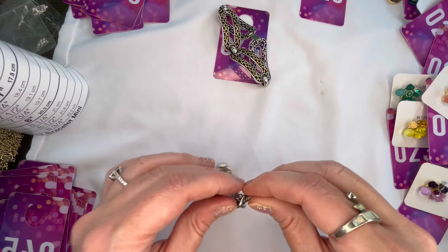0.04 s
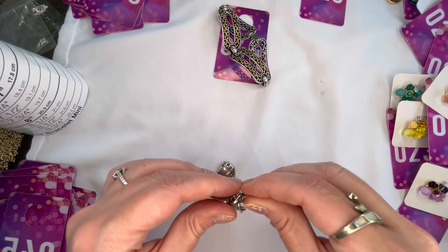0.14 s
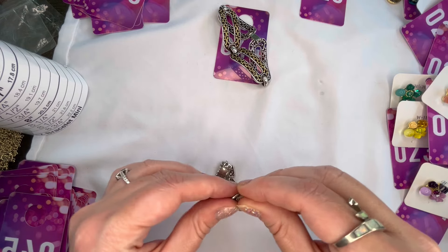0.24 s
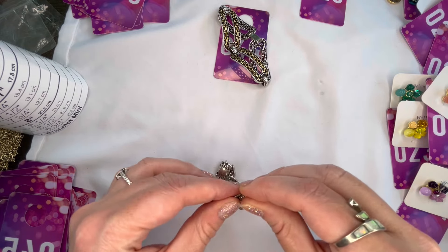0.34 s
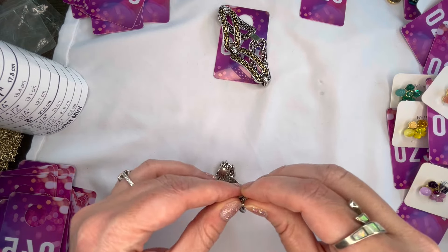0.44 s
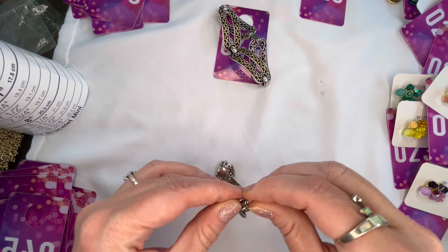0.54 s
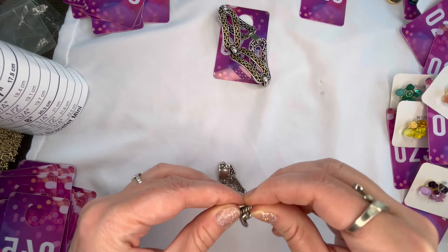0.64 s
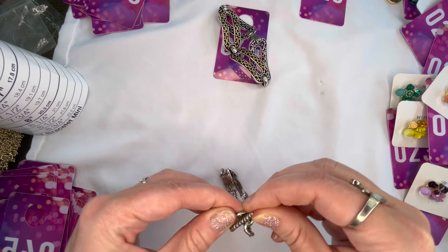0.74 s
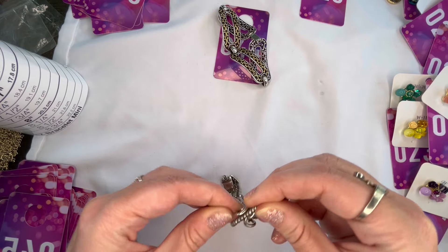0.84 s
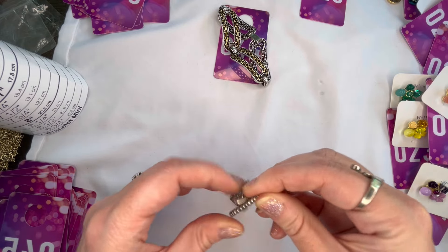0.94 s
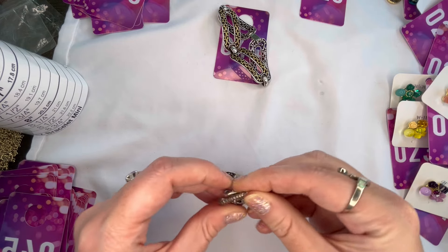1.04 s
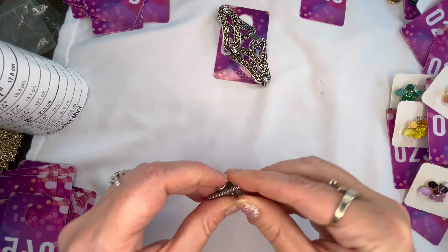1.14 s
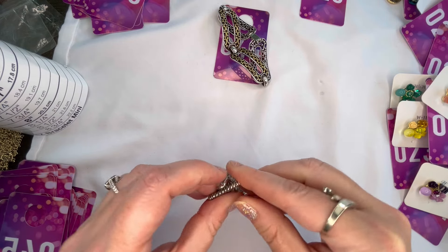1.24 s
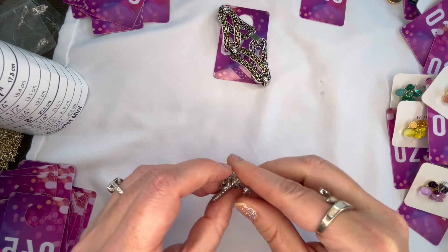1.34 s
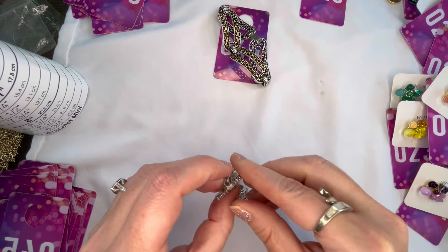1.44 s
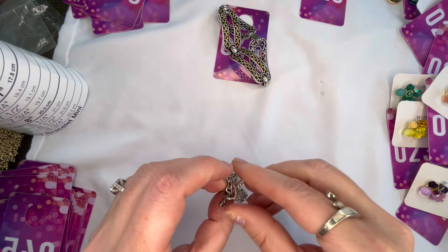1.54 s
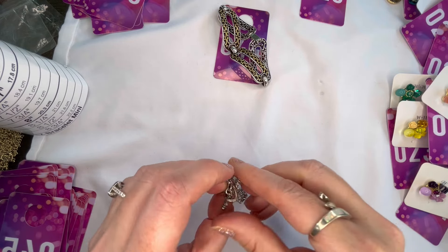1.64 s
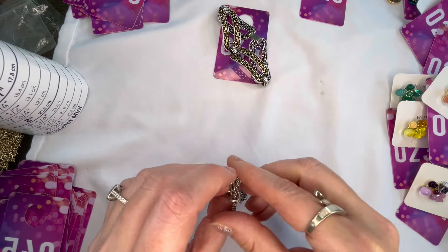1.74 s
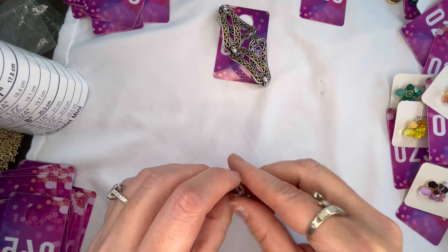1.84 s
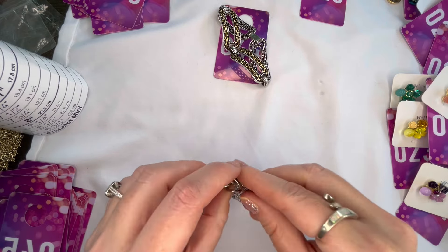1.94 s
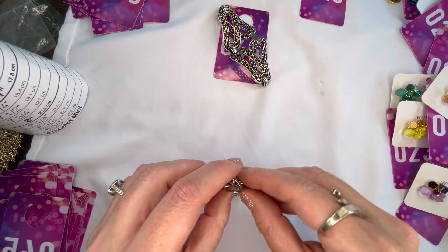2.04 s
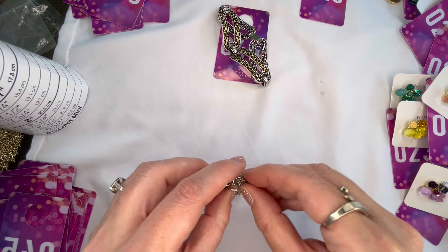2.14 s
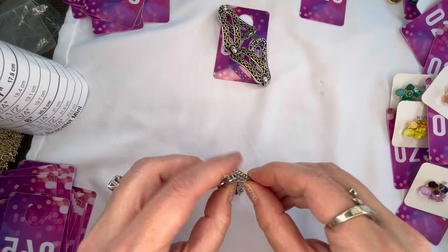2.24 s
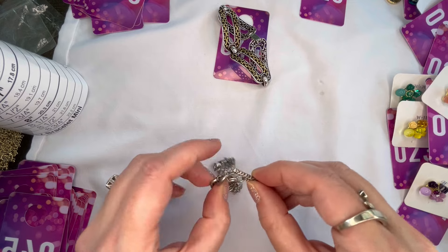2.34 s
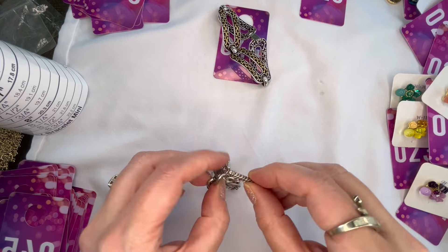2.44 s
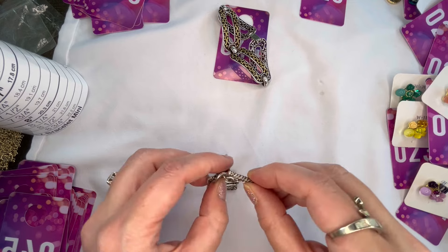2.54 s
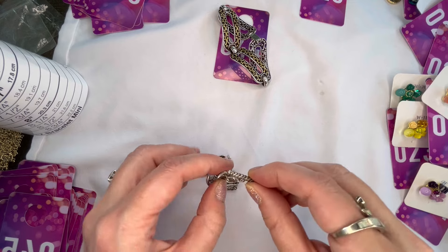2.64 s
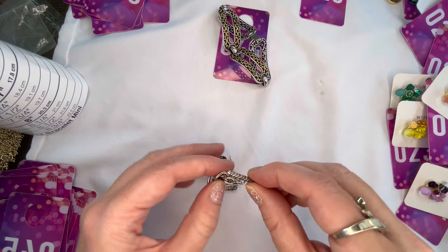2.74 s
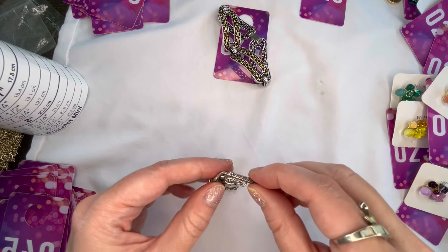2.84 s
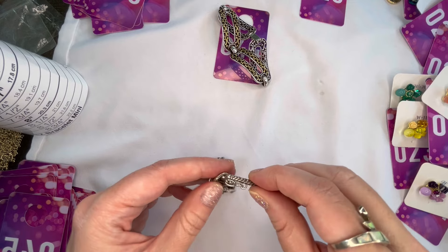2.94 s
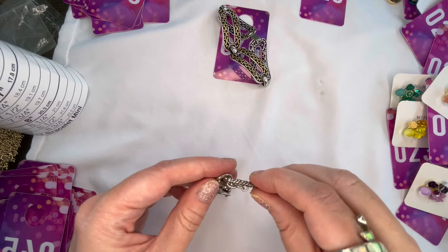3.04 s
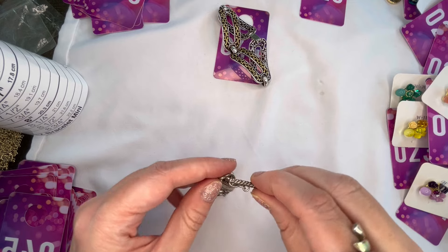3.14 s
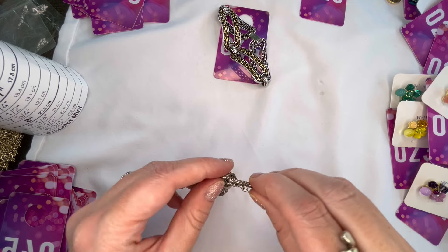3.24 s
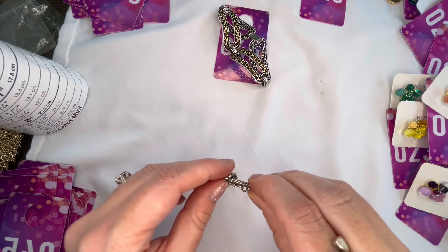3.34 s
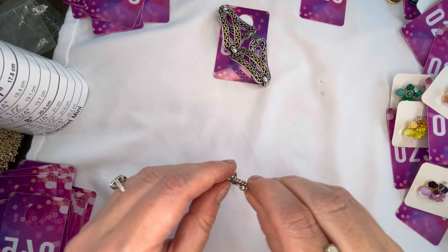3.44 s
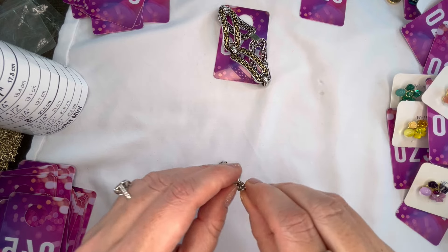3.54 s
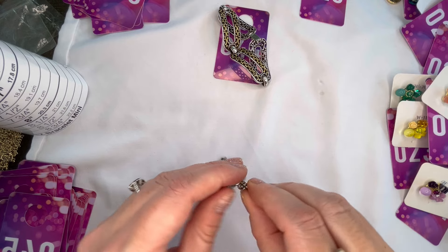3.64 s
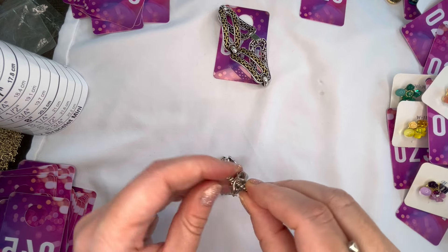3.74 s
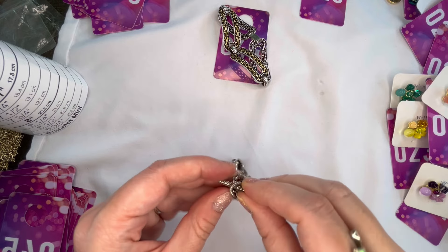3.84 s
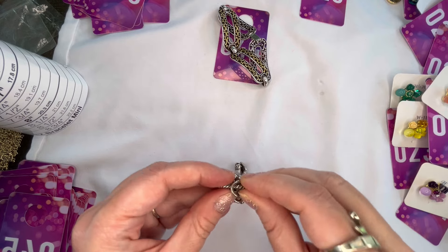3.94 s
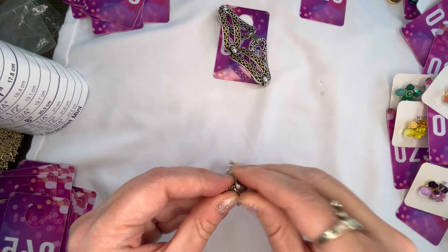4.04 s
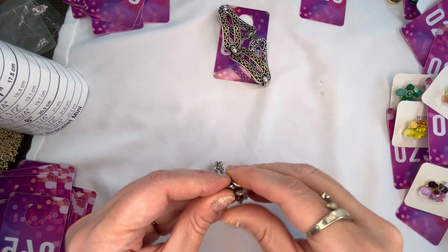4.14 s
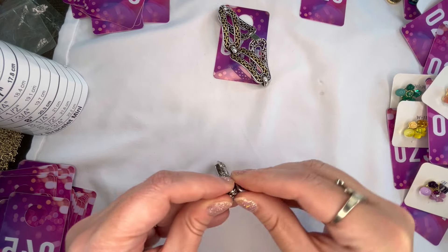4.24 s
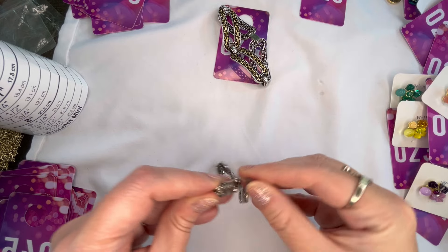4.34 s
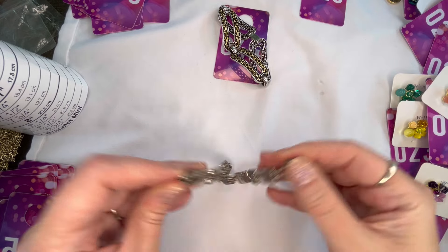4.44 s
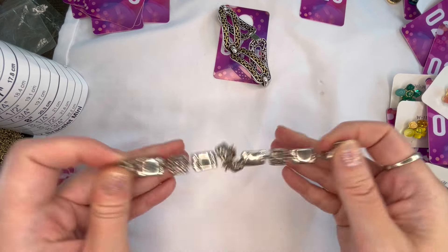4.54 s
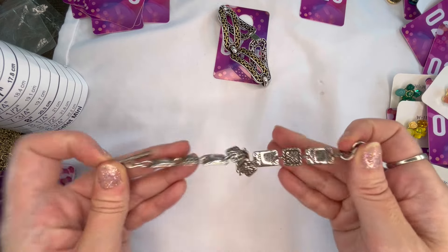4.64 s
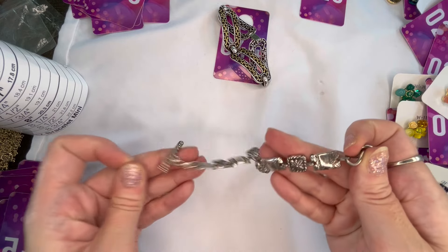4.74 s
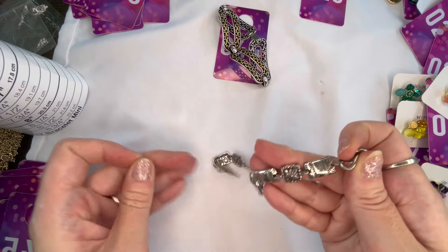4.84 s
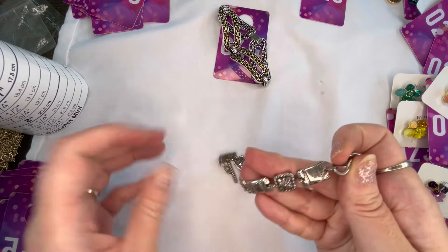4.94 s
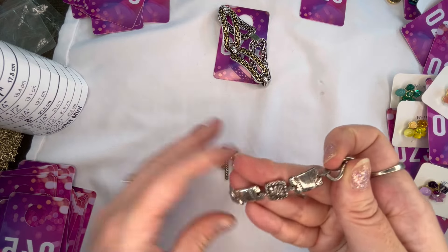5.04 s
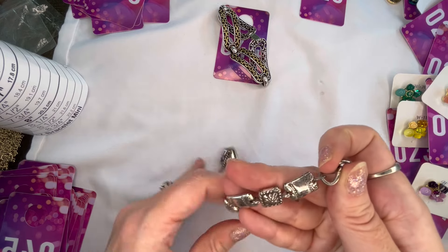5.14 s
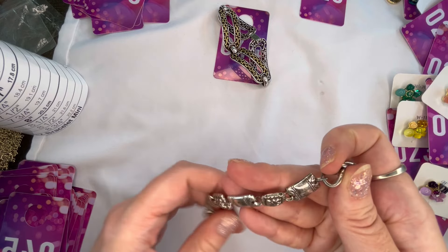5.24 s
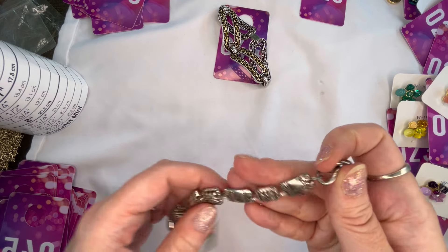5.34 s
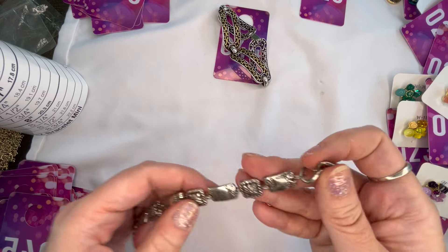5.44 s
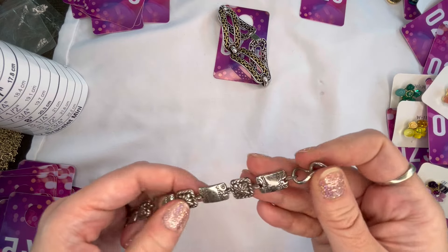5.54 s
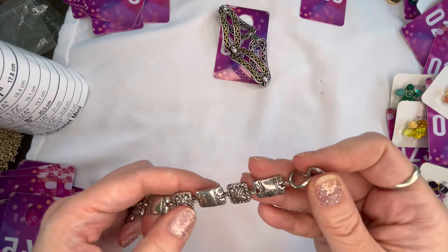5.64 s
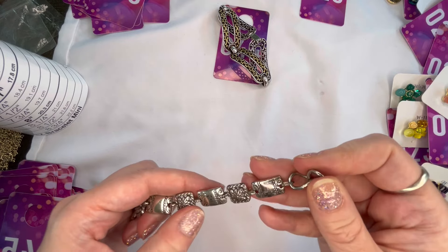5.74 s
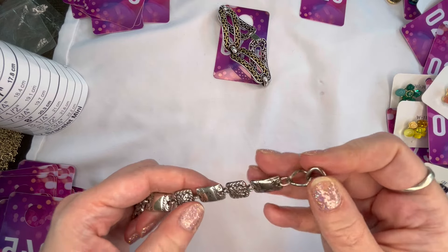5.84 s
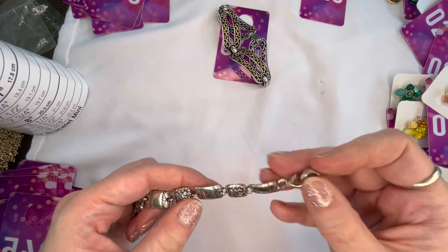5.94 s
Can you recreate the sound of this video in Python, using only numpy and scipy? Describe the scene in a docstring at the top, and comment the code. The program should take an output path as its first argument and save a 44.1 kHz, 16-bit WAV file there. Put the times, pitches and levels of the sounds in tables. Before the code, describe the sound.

Delicate high metal ticks and dry link rubbing from hands close to the microphone, over soft room rumble and mains hum. They start in a little flurry, thin out, then thicken past the middle. Near the end comes by far the loudest event, a hard crack on a cloth-covered table with a piercing short ring, followed by a thin hissing drag, a smaller knock and a hollow clack.

```python
"""A small quiet room, a two-port camera microphone close to hands that work a steel bracelet's clasp over a table.
First a cluster of ticks and soft knocks, a fingertip brushing metal, then sparser ticks and grinding of the links.
From about 3.4 s the links get busier; near 4.83 s the freed end drops on the clothed table and rings very high.
It is dragged hissing over the weave, knocks again near 5.54 s, and the gathered links clink and clack at 5.93 s.
Throughout: filtered-noise rumble and hiss, sine mains hum. Metal is noise bursts and decaying sines."""
import sys
import numpy as np
from scipy import signal
from scipy.fft import rfft, irfft, next_fast_len
from scipy.io import wavfile
from scipy.ndimage import uniform_filter1d, map_coordinates

SR = 44100
rng = np.random.default_rng(int(sys.argv[2]) if len(sys.argv) > 2 else 0)


def generate_wav(signal):
    """Clip the signal to [-1, 1] and save it as 16-bit WAV at the path in sys.argv[1]."""
    frames = np.transpose(np.atleast_2d(signal))
    scaled = np.clip(frames, -1, 1) * 32767
    pcm = np.round(scaled).astype(np.int16)
    wavfile.write(sys.argv[1], SR, pcm)


N = 263530  # samples


def amp(db):
    """Decibels to gain."""
    return 10 ** (np.asarray(db) / 20)


def unit(x):
    """Scaled to rms 1."""
    return x / np.sqrt(np.mean(x ** 2) + 1e-20)


def attack_unit(x):
    """Scaled to rms 1 over the first 3 ms."""
    return x / np.sqrt(np.mean(x[..., :3 * SR // 1000] ** 2))


def along(points, hz):
    """(f/Hz, value) points joined on a log frequency axis."""
    f, v = np.transpose(points)
    return np.interp(np.log(hz + 1), np.log(f + 1), v)


def curves(rows):
    """One value per sample for each column after the time."""
    s, *columns = np.transpose(rows)
    return [np.interp(np.arange(N) / SR, s, column) for column in columns]


def wobble(rate):
    """A smooth random curve, rate knots a second."""
    knots = rng.standard_normal(int(N * rate / SR) + 4)
    return map_coordinates(knots, [np.arange(N) * rate / SR])


def coloured(x, db_of):
    """Causal minimum-phase filter with a gain in dB at each frequency."""
    n = x.shape[-1]
    m = 2 * next_fast_len(n + 2048)
    gain = amp(db_of(np.fft.rfftfreq(m, 1 / SR)))
    cepstrum = irfft(np.log(gain + 1e-6))
    # fold the cepstrum onto positive time
    cepstrum[1:m // 2] *= 2
    cepstrum[m // 2 + 1:] = 0
    return irfft(rfft(x, m) * np.exp(rfft(cepstrum)), m)[..., :n]


def noise(spectrum):
    """Noise of rms 1 with the given spectrum."""
    return unit(coloured(rng.standard_normal(N), lambda hz: along(spectrum, hz)))


def evened(burst, size=9):
    """A noise burst with its chance spectral peaks and dips flattened, as even as an impulse."""
    power = np.abs(uniform_filter1d(np.abs(rfft(burst)) ** 2, size))
    burst_hz = np.fft.rfftfreq(len(burst), 1 / SR)
    return coloured(burst, lambda hz: -10 * np.log10(np.interp(hz, burst_hz, power) + 1e-12))


def fade(t, t60):
    """Exponential decay by 60 dB in t60 seconds."""
    return np.exp(-np.log(1000) * t / t60)


def ringing(modes, t):
    """A sum of decaying modes (f/Hz, level/dB, t60/s) with new phases."""
    return sum(amp(db) * fade(t, t60) * np.sin(2 * np.pi * (hz * t + rng.random()))
               for hz, db, t60 in modes)


def add(track, s, sound):
    """Mix a sound into a track at s seconds."""
    start = max(round(s * SR), 0)
    part = sound[..., :max(N - start, 0)]
    track[..., start:start + part.shape[-1]] += part


# background colour at each microphone port: (f/Hz, relative level/dB)
LEFT_FLOOR = [(20, -22.5), (45, -1), (100, -6), (160, -15.5), (300, -23.5), (700, -30.5), (950, -25.5),
              (1200, -17), (1600, -19.5), (1950, -35), (2900, -42), (7000, -45.5), (11000, -55),
              (14000, -63)]
RIGHT_FLOOR = [(20, -3.5), (45, -0.5), (100, -2.5), (160, -14.5), (300, -20.5), (700, -32), (1200, -28.5),
               (1600, -35), (2300, -42), (5500, -51), (9500, -42), (11500, -56.5), (14000, -68)]
# slow drift of the room rumble about its mean: (t/s, level/dB)
RUMBLE_DRIFT = [(0.0, -59.5), (0.7, -62), (1.15, -62.5), (1.56, -62), (3.06, -61), (3.2, -59), (5.38, -60),
                (5.98, -61)]
RUMBLE_SWING_DB, RUMBLE_SWINGS_PER_S = 0.82, 4.88  # the rumble wanders at random
MAINS_HZ, WHINE_HZ = 60, 7850


def background(left_db=-58, right_db=-58, hum_db=-63, whine_db=-90):
    """Rumble common to both ports, each port's own hiss, mains hum and a faint narrow whine."""
    # the ports share the lows, up to some 450 Hz
    shared_db = lambda hz: -10 * np.log10(1 + (hz / 450) ** 4)
    own_db = lambda hz: 10 * np.log10(1.05 - amp(shared_db(hz)) ** 2)
    drift_db, = curves(RUMBLE_DRIFT)
    level_db = drift_db - drift_db.mean() + RUMBLE_SWING_DB * wobble(RUMBLE_SWINGS_PER_S)
    shared = coloured(rng.standard_normal(N), shared_db) * amp(level_db)
    white = shared + coloured(rng.standard_normal((2, N)), own_db)
    left = amp(left_db) * unit(coloured(white[0], lambda hz: along(LEFT_FLOOR, hz)))
    right = amp(right_db) * unit(coloured(white[1], lambda hz: along(RIGHT_FLOOR, hz)))
    t = np.arange(N) / SR
    hum = amp(hum_db) * unit(amp(3.5 * wobble(2.6)) * np.sin(2 * np.pi * MAINS_HZ * t))
    whine = amp(whine_db) * unit(wobble(560) * np.sin(2 * np.pi * WHINE_HZ * t))
    return np.array([left, right]) + hum + whine


# decay of the small room: (f/Hz, t60/s)
ROOM_DECAY = [(150, 0.25), (1000, 0.2), (3500, 0.26), (10000, 0.21), (15000, 0.054)]


def room(x):
    """A diffuse noise tail for each port, 3.3 ms late; the highest treble dies first."""
    hz, t, z = signal.stft(rng.standard_normal((2, SR // 2)), SR, nperseg=256)
    decaying = z * fade(t, along(ROOM_DECAY, hz)[:, None])
    tail = signal.istft(decaying, SR, nperseg=256)[1]
    tail = np.pad(tail / np.linalg.norm(tail[0]), ((0, 0), (SR // 300, 0)))
    return signal.fftconvolve(x[None], tail, axes=1)[:, :N]


# how far the left port leads the right for sound from between the hands: (f/Hz, phase/rad)
LEFT_LEAD = [(20, -0.5), (700, 1.4), (1500, 0.75), (3200, 3), (6300, 5.5), (9200, 6), (10200, 1.65),
             (11200, -0.4), (13400, -3), (15500, -6.5)]


def staggered(x):
    """The direct sound reaches the two ports out of step."""
    m = next_fast_len(N + SR // 2)
    turn = np.exp(.5j * along(LEFT_LEAD, np.fft.rfftfreq(m, 1 / SR)))
    return irfft(rfft(x, m) * np.array([turn, turn.conj()]), m)[:, :N]


def ports(x, scatter_db=-4, scatter_t60=0.0046, count=24):
    """Sound from between the hands: direct, plus what the moving fingers scatter differently to each port."""
    pair, t = staggered(x), np.arange(SR // 100) / SR
    # new scattering paths for each of count stretches of time
    for where in np.array_split(np.arange(N), count):
        paths = rng.standard_normal((2, len(t))) * fade(t, scatter_t60)
        paths *= amp(scatter_db) / np.linalg.norm(paths, axis=1, keepdims=True)
        add(pair, where[0] / SR, signal.fftconvolve(x[where][None], paths, axes=1))
    return pair


# a fingertip on the metal: one row of start t/s, length/s, level/dB
FINGERTIP = (.39, 0.086, -74.5)
# its hiss: (f/Hz, relative level/dB)
SKIN_HISS = [(1500, -32), (3200, -7), (4000, 0), (4800, -21), (7000, -35)]


def brush(uneven_db=6, scrapes_per_s=90):
    """Skin slides over metal: a soft swell of narrow hiss, broken into light scrapes."""
    start, length, db = FINGERTIP
    swell = np.sin(np.pi * np.clip((np.arange(N) / SR - start) / length, 0, 1))
    scrapes_db = uneven_db * np.clip(wobble(scrapes_per_s), -2, 1)
    return amp(db + scrapes_db) * swell * noise(SKIN_HISS)


# hiss of the chain dragged over the weave: (t/s, level/dB)
DRAG_HISS = [(4.97, -100), (5.06, -72.5), (5.14, -68.5), (5.26, -67), (5.36, -69), (5.45, -71.5),
             (5.53, -74), (5.6, -100)]
# colour of that hiss: (f/Hz, relative level/dB)
CLOTH_COLOUR = [(500, 0), (2500, -3.5), (4000, -1.5), (5800, -0.5), (7300, -9), (9000, -6.5), (12000, -27),
                (16000, -16.5)]
# thin whistle of the chain on the weave: (t/s, level/dB, f/Hz)
WEAVE_WHISTLE = [(5.0, -120, 7500), (5.09, -73, 8050), (5.16, -77, 8500), (5.25, -88, 9600),
                 (5.33, -80, 9600), (5.43, -73, 8450), (5.47, -78, 7400), (5.52, -74, 5700),
                 (5.56, -140, 5000)]


def drag(whistle_width_hz=60, uneven_db=2):
    """Metal sliding on the weave: a hiss, and a thin whistle whose pitch follows the speed."""
    whistle_db, whistle_hz = curves(WEAVE_WHISTLE)
    whistle = unit(wobble(whistle_width_hz) * np.sin(2 * np.pi * np.cumsum(whistle_hz) / SR))
    hiss_db = curves(DRAG_HISS)[0] + uneven_db * wobble(44)
    return amp(hiss_db) * noise(CLOTH_COLOUR) + amp(whistle_db) * whistle


# hollow clacks of the gathered links: (t/s, level/dB, f/Hz)
HOLLOW_CLACKS = [(5.944, -33, 1520), (5.9508, -27, 1400)]


def clacks(t60=0.017, rise_s=0.00094):
    """Links falling together in the hand give a short hollow note."""
    track, t = np.zeros(N), np.arange(SR // 10) / SR
    for s, db, hz in HOLLOW_CLACKS:
        add(track, s, ringing([(hz, db, t60)], t) * (1 - np.exp(-t / rise_s)))
    return track


# blows on the table and in the hands:
# (t/s, energy level/dB, f/Hz above which it is softened, room share level/dB)
BLOWS = [(0.004, -22, 302, -8), (0.012, -30, 1480, -1.5), (0.056, -28.5, 259, -6), (4.058, -27.5, 258, -4),
         (4.8232, -4.5, 2335, -8), (4.84, 3.5, 6400, -7), (5.205, -21, 427, -3), (5.540, -16.5, 1697, -3),
         (5.932, -34.5, 1440, 5.5)]
# the bare impact: (f/Hz, relative level/dB)
IMPACT = [(60, -9), (190, 0), (280, -2.5), (480, -6), (850, 0), (1400, -3.5), (2100, -0.5), (2450, -3.5),
          (3400, 2.5), (5000, -3), (8000, -4), (11000, -9.5), (16000, -19.5)]
# resonances of the table top: (f/Hz, width/Hz, boost level/dB)
TABLE_TOP = [(183, 28, 8), (371, 30, 8), (745, 32, 5), (870, 40, 4.5), (988, 29, 5), (1840, 40, 3.5),
             (2045, 70, 6), (2765, 75, 7), (3080, 85, 3), (3570, 100, 6.5), (4630, 100, 5), (6120, 180, 6)]


def table_db(hz):
    """The impact spectrum with the resonances of the table top on it."""
    resonances = sum(db / (1 + (2 * (hz - centre) / width) ** 2) for centre, width, db in TABLE_TOP)
    return along(IMPACT, hz) + resonances


def knocks(crack_t60=0.022, own_share=1.51, own_hz=450):
    """Blows softened by cloth or skin; returns the direct sound and what goes into the room."""
    direct, sent, t = np.zeros((2, N)), np.zeros(N), np.arange(SR // 6) / SR
    burst = lambda: rng.standard_normal(len(t)) * fade(t, crack_t60)
    own_db = lambda hz: -10 * np.log10(1 + (own_hz / (hz + 1)) ** 4)
    for s, db, soft_hz, room_db in BLOWS:
        # above the bass, the wide top reaches each port partly by its own path
        common = burst()
        crack = np.array([evened(common + own_share * coloured(burst(), own_db)) for _ in range(2)])
        blow = coloured(crack, lambda hz: table_db(hz) - 10 * np.log10(1 + (hz / soft_hz) ** 4))
        blow *= amp(db) / np.linalg.norm(blow[0])
        add(direct, s, blow)
        add(sent, s, amp(room_db) * blow[0])
    return direct, sent


# strikes of the loose end: (t/s, level/dB, free time before damping/s)
END_STRIKES = [(4.8465, -19, .038), (4.928, -52, 0.016), (5.122, -62, .06), (5.191, -59, 0.049),
               (5.25, -65, 0.044), (5.54, -58, 0.005)]
# its modes: (f/Hz, relative level/dB, t60/s)
END_MODES = [(14410, 2.5, 0.4), (14300, -25, .08), (15020, -42.5, 0.085), (10500, -35.5, .06),
             (12400, -34.5, .06)]


def end_piece(choke_t60=0.032, flutter=.14):
    """The loose end rings very high, fluttering against its neighbours, until it settles on the cloth."""
    track, t = np.zeros(N), np.arange(SR // 5) / SR
    for s, db, free_s in END_STRIKES:
        choke = fade(np.maximum(t - free_s, 0), choke_t60)
        add(track, s, amp(db) * ringing(END_MODES, t) * choke)
    return track * (1 + flutter * wobble(900))


# each move of the fingers rubs the links together: (start t/s, length/s, level/dB)
FINGER_MOVES = [(0.0, 0.067, -55), (0.103, 0.086, -74.5), (0.805, 0.11, -74), (0.927, 0.097, -62),
                (1.068, 0.076, -69), (1.349, 0.14, -78.5), (1.779, 0.16, -85), (2.114, 0.026, -70),
                (2.228, 0.11, -78), (2.465, 0.018, -68), (2.588, 0.036, -77), (2.817, 0.05, -81),
                (3.142, .048, -74.5), (3.436, 0.011, -73), (3.51, .045, -70), (3.59, 0.066, -61),
                (3.658, .065, -60), (3.991, .06, -66), (4.186, 0.069, -80), (4.402, 0.037, -69),
                (4.569, 0.24, -75), (4.757, 0.14, -59), (5.116, 0.18, -68.5), (5.535, 0.053, -80.5),
                (5.926, 0.051, -57)]
RUB_ATTACK_S, RUB_RELEASE_T60 = .005, 0.083
IDLE_DB = -95.5  # links stirring faintly in the hands between moves


def rubbing():
    """Strength of the rubbing: each move rises quickly, holds and dies away."""
    t = np.arange(N) / SR
    strength = amp(IDLE_DB)
    for start, length, db in FINGER_MOVES:
        rise = np.clip((t - start) / RUB_ATTACK_S + 1, 0, 1)
        release = fade(np.maximum(t - start - length, 0), RUB_RELEASE_T60)
        strength = strength + amp(db) * rise * release
    return strength


# colour of link on link: (f/Hz, relative level/dB)
LINK_COLOUR = [(300, -26), (1500, -13), (2800, -15), (4200, -10.5), (5700, -7.5), (7300, -5.5), (9000, 0),
               (10700, 0), (12000, -4), (13200, -8.5), (14500, -4.5), (15700, -3.5), (16400, -6.5)]


def grind(slips_per_s=380, spread_db=5, life_s=0.0057):
    """Links sliding over each other slip in many tiny steps."""
    sizes = amp(spread_db * np.clip(rng.standard_normal(N), -2, 2))
    slips = (rng.random(N) < slips_per_s / SR) * sizes
    t = np.arange(SR // 100) / SR
    power = np.abs(signal.fftconvolve(slips ** 2, fade(t, life_s) ** 2)[:N])
    chatter = np.sqrt(power) * rng.standard_normal(N)
    return rubbing() * unit(coloured(chatter, lambda hz: along(LINK_COLOUR, hz)))


CATCHES_PER_S, CATCH_DB, CATCH_SPREAD_DB = 31, 5.5, 2  # small ticks within a rub; level over the rub's
CATCH_HZ, CATCH_DETUNE, CATCH_T60 = 9700, 0.25, 0.012  # mean ring, largest relative scatter, contact/s
CATCH_MAX_DB = -54.5  # finger pressure bounds them


def catches():
    """While a rub lasts the links catch at random moments, harder in a harder rub; rows as for ticks()."""
    rows = []
    for start, length, db in FINGER_MOVES:
        for when, force, size in rng.uniform(-1, 1, (8, 3))[:round(CATCHES_PER_S * length)]:
            s = start + length * (when + 1) / 2
            level_db = min(db + CATCH_DB + CATCH_SPREAD_DB * force, CATCH_MAX_DB)
            rows.append((s, level_db, CATCH_HZ * (1 + CATCH_DETUNE * size), CATCH_T60))
    return rows


def ticks(contacts, spectrum, ring_db=-4, uneven_db=4, rattle_db=-27, rattle_t60=0.039):
    """Each contact: uneven micro-slips, a ring choked by the fingers, and a rattle of the next links."""
    track, t = np.zeros(N), np.arange(SR // 20) / SR
    knots = t[::SR // 1000]
    for s, db, hz, t60 in contacts:
        unevenness = np.interp(t, knots, rng.standard_normal(len(knots)))
        slips = amp(uneven_db * np.clip(unevenness, -1.5, 1.5))
        force = slips * fade(t, t60) + amp(rattle_db) * fade(t, rattle_t60)
        crack = coloured(rng.standard_normal(len(t)) * force, lambda f: along(spectrum, f))
        ring = ringing([(hz, ring_db, t60 + 0.0041)], t)
        touch = 1 - np.exp(-t / 0.00061)  # the contact takes a moment to close
        add(track, s, amp(db) * attack_unit(touch * (attack_unit(crack) + ring)))
    return track


# heavy plates falling together in the hand: (t/s, level/dB, ring f/Hz, contact t60/s)
PLATE_CLINKS = [(5.9295, -31, 6850, 0.015), (5.9355, -32.5, 9330, 0.021), (5.9404, -30, 9250, 0.0058),
                (5.9475, -34.5, 8300, 0.017)]
# their colour: (f/Hz, relative level/dB)
PLATE_COLOUR = [(300, -27), (1400, -14.5), (3000, -16.5), (4000, -10.5), (7000, -2), (9500, 0.5),
                (11000, -13.5), (13000, -17), (15700, -18), (16400, -35.5)]


def plate_clinks():
    """Heavy plates strike each other: contacts with a lower, darker colour than the links."""
    return ticks(PLATE_CLINKS, PLATE_COLOUR)


# the clearest ticks of link against link: (t/s, level/dB, ring f/Hz, contact t60/s: long ones scrape)
LINK_TICKS = [(0.0023, -38.5, 9250, 0.012), (0.0128, -39, 11500, 0.0054), (0.03, -45, 9700, 0.025),
              (0.055, -49, 10800, 0.016), (0.2128, -60, 9100, 0.0076), (0.2452, -56.5, 9400, 0.0044),
              (0.2932, -54.5, 8780, 0.0077), (0.5945, -66, 6800, .009), (0.617, -62, 6800, 0.013),
              (0.7632, -62, 9000, .005), (0.796, -56.5, 8970, 0.017), (0.817, -53.5, 9200, 0.011),
              (0.92, -52, 9800, 0.014), (0.93, -51, 9400, .02), (0.952, -47.5, 10290, 0.026),
              (0.9912, -49.5, 10700, 0.012), (1.021, -53, 8100, 0.018), (1.1, -53, 8430, 0.018),
              (1.1266, -46.5, 11400, 0.0096), (1.3367, -68.5, 8700, .005), (1.3617, -61.5, 10400, 0.0071),
              (1.395, -65, 7750, 0.0055), (1.4592, -55, 10500, 0.0053), (1.859, -52, 10700, 0.013),
              (1.8732, -56.5, 11300, 0.0066), (1.933, -55.5, 11100, 0.0058), (2.018, -64, 8900, 0.0024),
              (2.231, -59.5, 7900, 0.0043), (2.279, -54, 9700, 0.0075), (2.3061, -50.5, 10800, 0.0058),
              (2.582, -51.5, 9170, 0.0051), (2.612, -60, 10960, .011), (2.8121, -58, 10850, .008),
              (3.148, -62.5, 8850, .022), (3.1937, -63.5, 8800, 0.012), (3.468, -58, 12520, 0.0058),
              (3.5942, -54, 10750, 0.018), (3.703, -53, 11600, 0.0055), (3.7253, -48, 10850, 0.0052),
              (3.8427, -59.5, 11000, 0.0056), (3.993, -49.5, 11820, 0.0045), (4.019, -49.5, 8800, 0.009),
              (4.0401, -48, 9100, 0.035), (4.051, -46, 10940, 0.013), (4.1765, -53, 10600, .012),
              (4.1867, -47.5, 9200, 0.0082), (4.2146, -51.5, 11800, 0.011), (4.225, -53.5, 10900, 0.017),
              (4.276, -52, 9940, .014), (4.2856, -50, 11600, 0.014), (4.3941, -46.5, 8600, 0.0046),
              (4.615, -53.5, 10900, 0.03), (4.624, -51.5, 7200, 0.01), (4.6319, -48, 10100, 0.0092),
              (4.6683, -52.5, 10000, 0.0074), (4.7326, -52.5, 9500, .006), (4.7527, -43, 10040, 0.0046),
              (4.79, -47, 11200, .013), (4.8312, -33.5, 10920, 0.056), (4.847, -25.5, 11150, 0.014),
              (4.947, -51, 10270, .015), (5.1198, -52.5, 9600, .014), (5.1387, -53, 11300, .015),
              (5.2105, -40.5, 9100, 0.0036), (5.26, -51, 11300, 0.016), (5.276, -52, 11260, 0.0056),
              (5.8588, -63.5, 8780, 0.005)]


def link_ticks():
    """Link strikes link in the fingers: the clear ticks, and the small catches within each rub."""
    return ticks(LINK_TICKS, LINK_COLOUR) + ticks(catches(), LINK_COLOUR)


# unlike colour of the two ports: (f/Hz, left minus right level/dB)
PORT_COLOUR = [(150, 0), (700, 2), (2300, 3.5), (3200, 3), (5300, 7.5), (7300, 4.5), (8900, -8),
               (10600, -0.5), (11600, -2), (16000, 1)]


def scene():
    """Bracelet and table, heard through two ports of unlike colour, over the background."""
    floor = background()
    table, table_sent = knocks()
    ring = end_piece()
    links = brush() + drag() + grind() + plate_clinks() + link_ticks()
    room_send = amp(-8) * links + table_sent + amp(-14) * ring
    sound = ports(links) + table + clacks() + room(room_send)
    left = coloured(sound[0], lambda hz: along(PORT_COLOUR, hz) / 2)
    right = coloured(sound[1], lambda hz: -along(PORT_COLOUR, hz) / 2)
    return np.array([left, right]) + staggered(ring) + floor


def record(dry, top_hz=16200):
    """The camera microphone's band limit: a very steep cut above top_hz."""
    m = next_fast_len(N + SR // 2)
    hz = np.fft.rfftfreq(m, 1 / SR)
    return irfft(rfft(dry, m) / np.sqrt(1 + (hz / top_hz) ** 160), m)[:, :N]


dry = scene()
out = record(dry)
generate_wav(out)
```